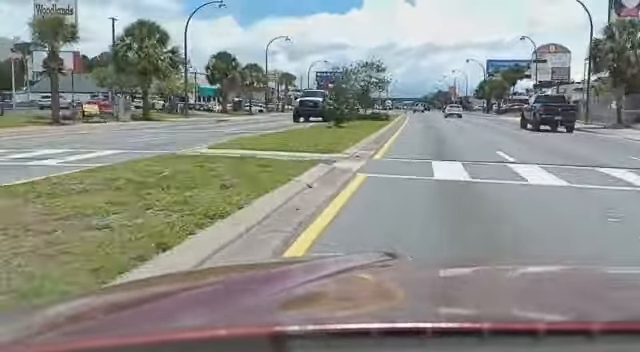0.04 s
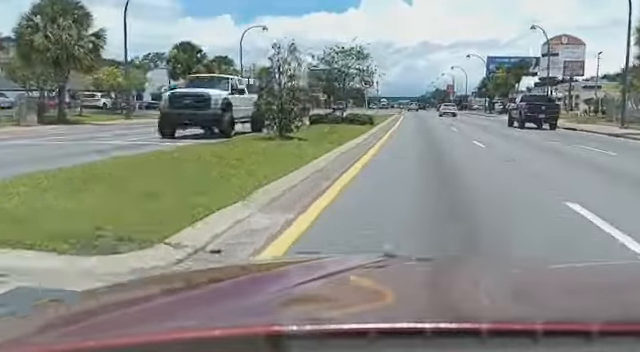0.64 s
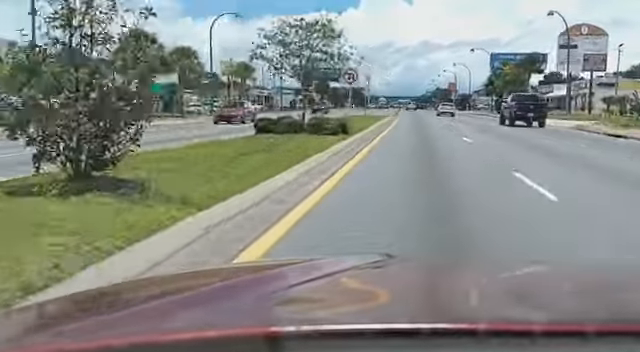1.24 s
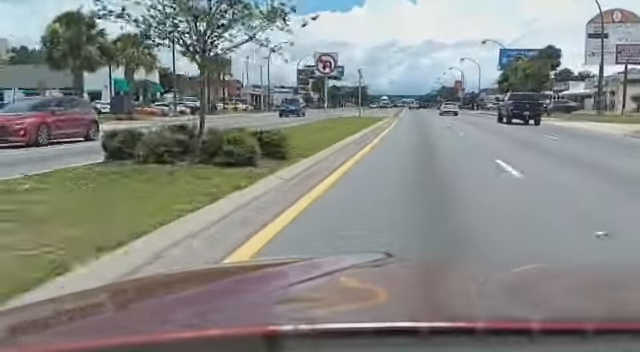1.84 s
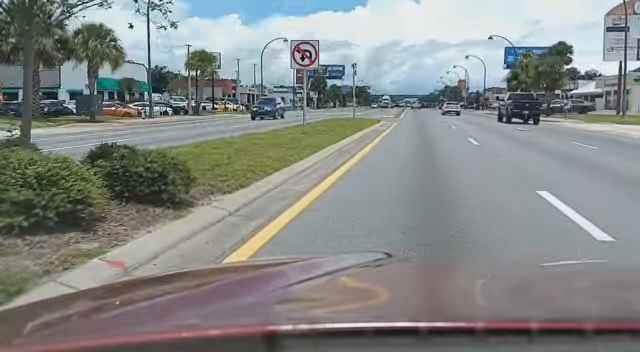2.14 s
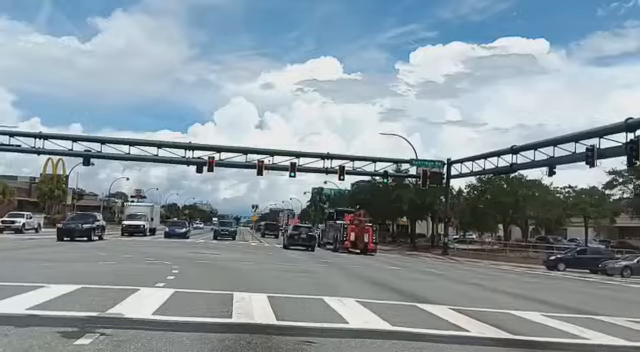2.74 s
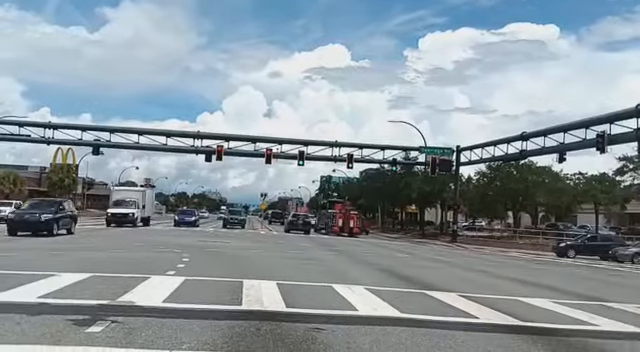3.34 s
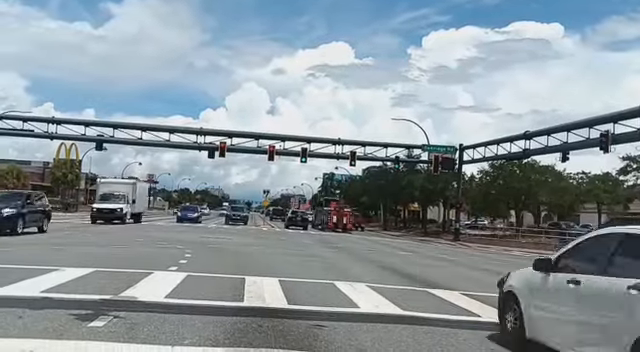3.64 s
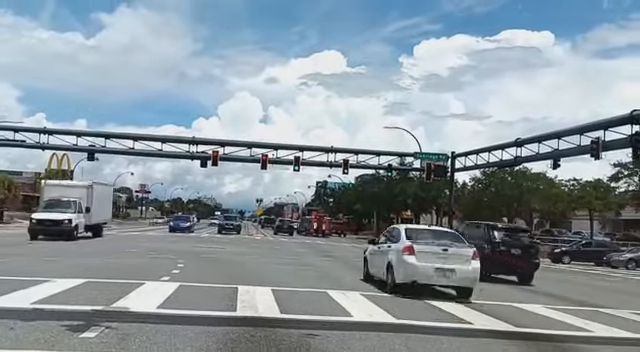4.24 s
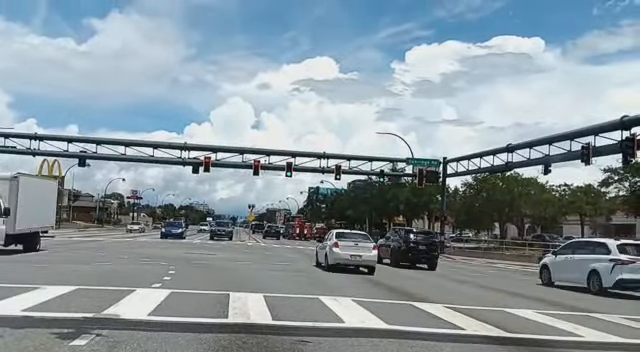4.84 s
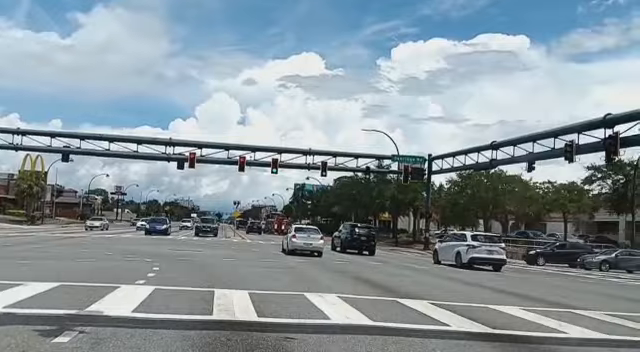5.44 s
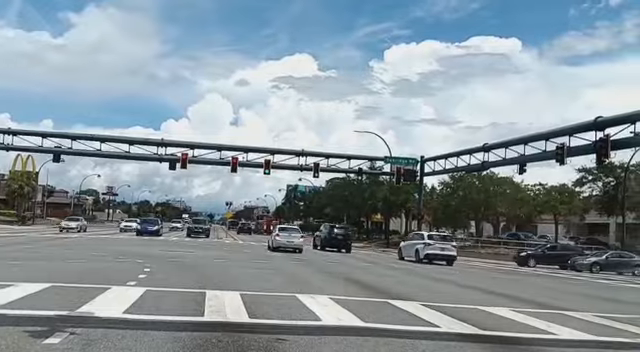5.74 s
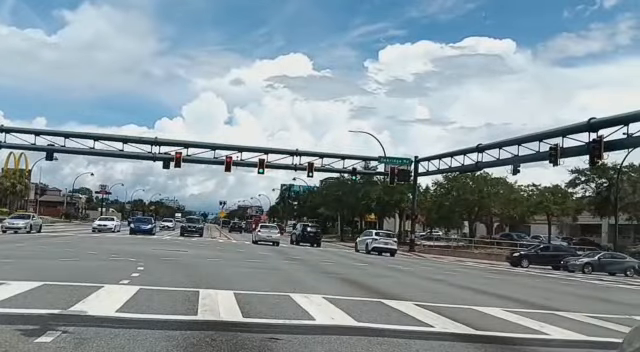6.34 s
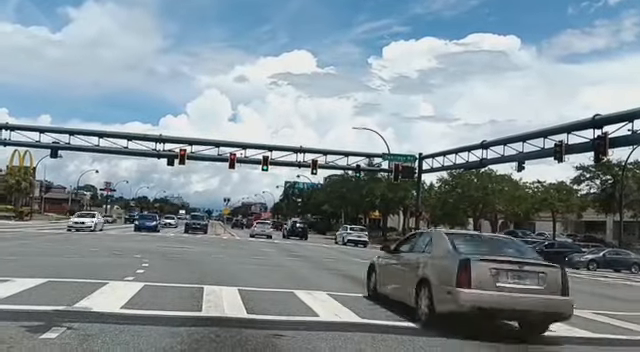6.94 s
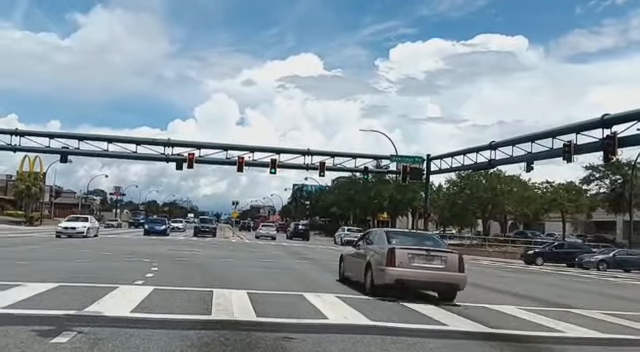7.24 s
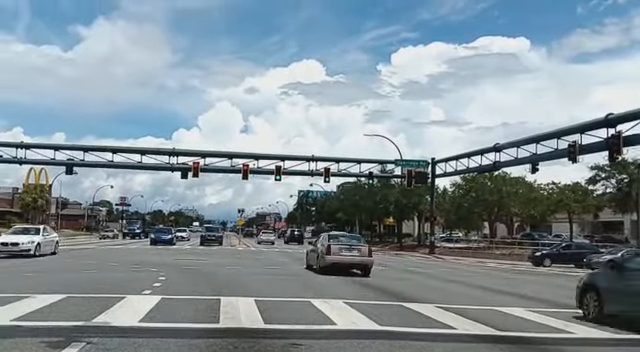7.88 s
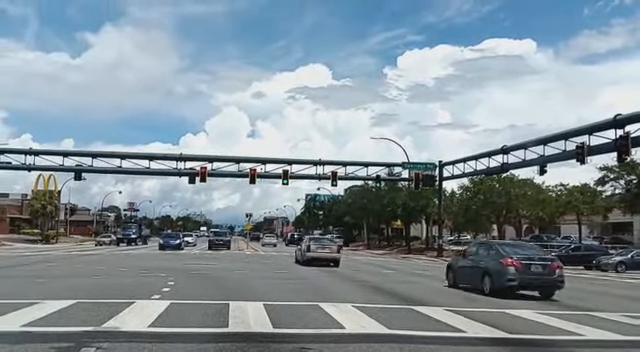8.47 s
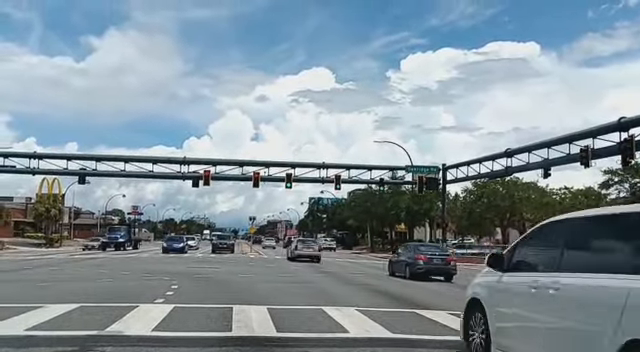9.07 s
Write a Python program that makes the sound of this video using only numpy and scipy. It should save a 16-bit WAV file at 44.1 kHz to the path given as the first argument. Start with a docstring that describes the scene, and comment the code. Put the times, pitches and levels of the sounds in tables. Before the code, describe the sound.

The sound is heard from inside a car with the windows closed. From the start it cruises along a town road, with a steady deep tyre rumble, an engine hum and very faint ticks and twitters of shaken trim. At about 0.8 seconds the wheels thump over a seam in the asphalt. At 2.4 seconds the drive cuts off into half a second of silence.

Around 2.9 seconds a quieter, lower idle fades in, with distant traffic behind it. The turn signal clicks evenly to the end, a bright tick alternating with a duller tock, nearly three clicks a second. A low exhaust drone swells near 3.2 seconds, and muffled cars pull past softly at about 3 to 4, 5.5 to 7 and 8.5 seconds. A faint, high, rapid chirping from a rotating part runs under both parts, growing slightly around 4 seconds. It ends at about 9 seconds.

```python
"""Tyres and engine rumble inside a car cruising along a town road. The wheels thump over a seam in
the asphalt, and the road shakes trim and panels. After a short silence the car stands idling at a
crossing: the turn-signal relay snaps and rings its housing, and other cars pull past beyond the
closed windows. A rotating part rubs and chirps faintly, both on the move and at idle."""
import sys
import numpy as np
from scipy import signal
from scipy.fft import rfft, irfft, next_fast_len
from scipy.io import wavfile
from scipy.ndimage import uniform_filter1d

SR = 44100
rng = np.random.default_rng(int(sys.argv[2]) if len(sys.argv) > 2 else 0)


def int16_out(signal):
    """Quantize to a 16-bit WAV file."""
    q = np.round(np.clip(np.atleast_2d(signal).T, -1, 1) * 32767)
    wavfile.write(sys.argv[1], SR, q.astype(np.int16))


N = 401751
TIME = np.arange(N) / SR
PAN = np.array([[.5], [-.5]])   # shares a left-minus-right dB value between the channels

# Modes of the relay and its housing. Each row: pitch in Hz, width in Hz, relative level in dB when
# pulling in, relative level in dB when dropping out.
RELAY_MODES = [(1540, 130, -12, -3), (2216, 120, -12.5, -11.5), (2760, 163, 1, -8), (2994, 98, -13, -5.5),
               (4090, 250, -10, -15), (4573, 270, -1, 1.5), (4810, 210, -11.5, -12), (5380, 150, -31, -12),
               (5730, 220, -12, -18), (6014, 260, 1, -7.5), (6370, 310, -2.5, -8), (7950, 140, -7, -2),
               (8620, 260, -19, -10), (8940, 430, 7.5, -5.5), (9380, 270, 4.5, -2.5),
               (10090, 230, -9, -5.5), (10300, 220, 4.5, -29), (11050, 360, 1.5, -9),
               (12270, 610, -11, -19.5), (13100, 740, -19, -31), (15550, 350, -15, -29)]


def road_noise():
    """Asphalt drives body rumble and tyre roar; both lift on the rough patch around the seam."""
    # Road noise in the cabin. Each row: frequency in Hz, relative density in dB.
    spectrum = [(20, -10.5), (40, 2), (85, -2), (130, -9), (180, -8.5), (300, -13.5), (410, -15.5),
                (550, -21), (800, -34.5), (1400, -40), (1950, -53), (2700, -69.5), (4500, -72.5),
                (10000, -76.5), (15000, -90)]
    # Cabin and tyre resonances. Each row: centre in Hz, width in Hz, lift in dB.
    modes = [(176, 18, 5.5), (235, 16, 2.5), (301, 17, 2.5), (470, 16, 2.5), (545, 16, 5), (1820, 200, 4)]
    rumble, roar = cabin_noise(spectrum, modes, splits_hz=[230], ripple_db=1.5)
    rough_patch = swell(0.8, 0.35)
    rumble_db = -17.5 + 2.0 * rough_patch
    roar_db = -22.5 + 1.2 * rough_patch + 0.67 * drift(19)
    return from_db(rumble_db) * rumble + from_db(roar_db) * murmur(roar, depth_db=1.5, rate=9)


def engine(firings_per_s, orders, rough, wander):
    """Orders of the firing rate; uneven combustion shakes their strength and phase."""
    firing_phase = 2 * np.pi * np.cumsum(firings_per_s) / SR
    out = np.zeros(N)
    for order, db in orders:
        phase = order * firing_phase + rng.uniform(0, 2 * np.pi) + wander * drift(1.7)
        out += np.sqrt(2) * from_db(db) * (1 + rough * drift(3.2)) * np.sin(phase)
    return out


def cruising_engine():
    """The engine hums under light load at a nearly even speed."""
    # Engine speed. Each row: time in seconds, firings per second.
    speed = [(0, 39.4), (.8, 37), (1.6, 39.0), (2.4, 38.1)]
    # Engine tones. Each row: multiple of the firing rate, rms level in dB.
    orders = [(1, -32.5), (2, -27.5), (3, -33.5), (4, -27), (6, -37.5)]
    return engine(np.interp(TIME, *np.transpose(speed)), orders, rough=0.43, wander=0.94)


def idling_engine():
    """A slow throb whose speed hunts a little around its mean."""
    # Idle tones. Each row: multiple of the firing rate, relative level in dB.
    orders = [(1, -7.5), (2, 0), (3, -19), (4, -16.5), (4.5, -20), (5, -10.5), (6, -17.5), (7, -18),
              (8, -17.5), (9, -32.5)]
    firings_per_s = 23.0 + 0.1297 * drift(1.51)
    return from_db(-26) * engine(firings_per_s, orders, rough=0.18, wander=0.25)


def seam_thumps(body_hz=45, decay_s=0.021):
    """Each wheel's blow sets the body booming for a cycle or two."""
    # Wheels hitting the seam. Each row: start in seconds, level in dB.
    blows = [(0.809, -2), (0.859, -1), (0.883, -9)]
    out, t = np.zeros(N), np.arange(SR // 4) / SR
    for start_s, db in blows:
        add(out, start_s, from_db(db) * np.sin(2 * np.pi * body_hz * t) * np.exp(-t / decay_s))
    return out


def relay(times, mode_db, level_db, rise_s, hold_s, t60, variation, ringing):
    """The armature's snap rings the housing; cabin reflections smear every tick much alike."""
    # Where the relay is heard. Each row: frequency in Hz, left minus right in dB.
    balance = [(1500, -1), (6000, -1), (8500, 10), (9300, -5), (10200, -11), (15000, -10)]
    t = np.arange(SR // 10) / SR
    smear = from_db(-60 * np.maximum(t - hold_s, 0) / t60) * (1 - np.exp(-(t / rise_s) ** 3))
    # the direct snap comes first, stronger on the nearer, right side
    smear = smear * (1 + np.array([[0.4], [1.6]]) * np.exp(-(t / 0.007) ** 2))
    paths = rng.standard_normal((2, len(t))) + variation * rng.standard_normal((len(times), 2, len(t)))
    clicks = 0
    for (hz, width, *_), db in zip(RELAY_MODES, mode_db):
        ring = resonate(resonate(paths * smear, hz, width * 1.36), hz, width * 2.4)
        ring += ringing * resonate(ring, hz, width / 4)   # a narrow, longer-lived core
        ring /= np.sqrt(np.mean(ring ** 2, axis=(0, 2), keepdims=True))
        clicks += from_db(db + at_hz(balance, hz) * PAN) * np.sqrt(width) * ring
    out = np.zeros((2, N))
    for time_s, click in zip(times, rms_one(clicks)):
        add(out, time_s - .003, from_db(level_db) * click)
    return out


def turn_signal(first_s=2.6621, blink_s=0.75339, closed_s=0.363):
    """The relay pulls in with a bright tick once a blink and drops out with a duller tock."""
    _, _, pull_db, drop_db = np.transpose(RELAY_MODES)
    pulls = np.arange(first_s, N / SR - closed_s, blink_s)
    ticks = relay(pulls, pull_db, level_db=-44,
                  rise_s=0.0017, hold_s=0.0088, t60=0.056, variation=0.5, ringing=0.87)
    tocks = relay(pulls + closed_s, drop_db, level_db=-51,
                  rise_s=0.0026, hold_s=0.0069, t60=0.068, variation=0.66, ringing=0.86)
    return ticks + tocks


def rotor_chirp(turns_per_s, rub_s, sharpness, light_rub, whine, sizzle, overtone_db, scrape_db):
    """A rotating part sings near 7 kHz; it rubs twice a turn, once firmly and once lightly."""
    angle = 2 * np.pi * turns_per_s * (TIME - rub_s) + .25 * drift(4)
    firm = np.exp(sharpness * (np.cos(angle) - 1)) * from_db(1.3 * drift(10))
    light = np.exp(2 * sharpness * (-np.cos(angle) - 1))
    squeal = tone(6964 + 35 * drift(90)) * (1 + 0.45 * drift(90))
    friction = rng.standard_normal((2, N))

    def band(hz, width):
        return rms_one(focus(friction, hz, width))

    overtones = (sizzle + firm) * (band(7700, 350) + 0.78 * band(7220, 250))
    overtones += 0.92 * firm * band(6350, 300)
    scrape = (sizzle + firm) * (band(10600, 1600) + 0.56 * band(2650, 250) + 0.56 * band(3700, 900))
    rub = from_db(overtone_db) * overtones + from_db(scrape_db) * scrape
    return squeal * (whine + 0.54 * firm + light_rub * light) + rub


def trim_ticks():
    """Tiny bright ticks of plastic shaken by the road, each with a short ring."""
    # Loose trim ticking. Each row: start in seconds, relative level in dB.
    ticks = [(.094, -43), (.154, -65.5), (0.293, -26), (.328, -45), (.349, -44)]
    out, t = np.zeros((2, N)), np.arange(SR // 20) / SR
    decay = np.exp(-t / .0018) + .15 * np.exp(-t / .009)
    for start_s, db in ticks:
        add(out, start_s, from_db(db) * rng.standard_normal((2, len(t))) * decay)
    bright = signal.sosfilt(signal.butter(3, [9700, 13000], "band", fs=SR, output="sos"), out + 1e-18)
    return bright + 1.5 * resonate(bright, hz=10850, width=80)


def trim_squeak(start_s=8.585, length_s=0.065, hz=10202):
    """A short, slightly rising squeak of trim on the right."""
    out, progress = np.zeros((2, N)), np.linspace(0, 1, round(length_s * SR))
    squeak = tone(hz + 250 * (progress - .5) + 80 * drift(200)[:len(progress)])
    add(out, start_s, from_db([[-66], [-56]]) * np.sin(np.pi * progress) ** 2 * squeak)
    return out


def panel_twitter(fitful_db=8.5):
    """Panels sing in random fits as the road shakes them."""
    # Panel resonances. Each row: pitch in Hz, width in Hz, rms level in dB.
    panels = [(2305, 55, -70), (2720, 60, -76), (3180, 47, -81), (4400, 200, -80.5)]
    out = 0
    for hz, width, db in panels:
        song = focus(rng.standard_normal((2, N)), hz, width)
        fits = from_db(fitful_db * np.tanh(drift(4.2)))
        out += from_db(db) * rms_one(song * fits)
    return out


def passing_cars(engine_noise, far_engines_db=-46):
    """Each car's engine and tyre hum swell out of the distant engines as it draws alongside."""
    # Cars pulling past. Each row: closest moment in seconds, spread in seconds, engine level in dB,
    # tyre level in dB.
    passes = [(3.27, 0.15, -46.5, -58.5), (3.7, 0.17, -52, -63), (5.6, 0.13, -45.5, -65.5),
              (6.25, 0.21, -45, -62.5), (7.0, 0.16, -49, -64.5), (8.42, 0.09, -56, -60),
              (8.75, 0.18, -46.5, -57.5)]
    hum = focus(rng.standard_normal((2, N)), hz=760, width=520)
    engine_gain = sum(from_db(db) * swell(at, spread) for at, spread, db, _ in passes)
    tyre_gain = sum(from_db(db) * swell(at, spread) for at, spread, _, db in passes)
    engines = np.hypot(from_db(far_engines_db), engine_gain) * engine_noise
    return engines + tyre_gain * murmur(hum, depth_db=5.5, rate=4.4)


def exhaust_drone(hz=57, level_db=-26):
    """The first car pulls away on a low, wavering exhaust note that beats against the idle."""
    return np.sqrt(2) * from_db(level_db) * swell(3.22, 0.26) * tone(hz + 1.26 * drift(2.7))


def traffic():
    """Far rumble, cabin boom, tyres and hiss through closed windows, with nearer cars on top."""
    # Noise in the standing car. Each row: frequency in Hz, relative density in dB.
    spectrum = [(20, -15.5), (58, 3), (80, -9.5), (170, -16.5), (240, -29.5), (350, -32), (520, -44),
                (700, -50.5), (1400, -61.5), (2000, -64.5), (4000, -74.5), (9000, -73.5), (15000, -87)]
    # Cabin resonances. Each row: centre in Hz, width in Hz, lift in dB.
    modes = [(177, 22, 1.5), (344, 56, 3.5), (526, 69, 3.5), (1450, 300, 10.5), (2610, 190, 2)]
    rumble, boom, engines, tyres, hiss = cabin_noise(
        spectrum, modes, splits_hz=[100, 215, 650, 2200], ripple_db=1.46)
    far = from_db(-35.5) * rumble + from_db(-36 + 2.1 * drift(3.3)) * boom
    far += from_db(-64) * murmur(tyres, depth_db=4, rate=5.4) + from_db(-73.5) * hiss
    return far + passing_cars(murmur(engines, depth_db=3, rate=3.4)) + exhaust_drone()


def cabin_noise(spectrum, modes, splits_hz, ripple_db):
    """Stereo noise coloured by the cabin, split into bands of unit rms."""
    # Stereo width in the cabin. Each row: frequency in Hz, left-right likeness from 0 to 1.
    likeness = [(40, 1), (170, 0.99), (390, 0.62), (600, 0.21), (1300, .4), (3000, 0.087), (15000, .05)]
    # Stereo lean in the cabin. Each row: frequency in Hz, left minus right in dB.
    balance = [(40, -0.5), (120, 0.4), (260, -3.2), (480, 1), (1000, -0.2), (2000, -1.5), (8000, 3),
               (14000, -4)]
    size = next_fast_len(N)
    hz = np.arange(size // 2 + 1) * SR / size
    mid, side = rfft(rng.standard_normal((2, size)))
    alike = at_hz(likeness, hz)
    noise = np.sqrt(1 + alike) * mid + np.sqrt(1 - alike) * side * [[1], [-1]]
    db = at_hz(spectrum, hz)
    db += sum(lift / (1 + (2 * (hz - centre) / width) ** 2) for centre, width, lift in modes)
    # countless small cabin modes ripple the response above the bass
    knots = np.geomspace(400, SR / 2, 150)
    db += ripple_db * np.interp(hz, knots, rng.standard_normal(len(knots)), left=0)
    noise *= from_db(db + at_hz(balance, hz) * PAN) * (hz > 19)
    band = np.searchsorted(splits_hz, hz)
    return [rms_one(irfft(noise * (band == k), size)[:, :N]) for k in range(len(splits_hz) + 1)]


def murmur(x, depth_db, rate):
    """Each narrow band swells and sinks on its own, like many distant vehicles; unit rms."""
    spectra = signal.stft(x, nperseg=1024)[2]
    pole = np.exp(-2 * np.pi * rate * 512 / SR)
    jitter = uniform_filter1d(rng.standard_normal(spectra.shape[1:]), size=3, axis=0)
    sway = rms_one(signal.lfilter([1], [1, -pole], jitter))
    return rms_one(signal.istft(spectra * from_db(depth_db * sway))[1][:, :N])


def drift(rate):
    """A smooth random wander of about unit rms, rolling off above rate in Hz."""
    hop, settle = 40, 2000
    pole = np.exp(-2 * np.pi * rate * hop / SR)
    white = rng.standard_normal(N // hop + settle + 2)
    slow = signal.lfilter([1], [1, -2 * pole, pole * pole], white)[settle:]
    return np.interp(np.arange(N) / hop, np.arange(len(slow)), rms_one(slow))


def swell(peak_s, spread_s):
    """A bell-shaped rise and fall."""
    return np.exp(-.5 * ((TIME - peak_s) / spread_s) ** 2)


def tone(hz):
    """A sine that follows a pitch curve."""
    return np.sin(2 * np.pi * np.cumsum(hz) / SR)


def resonate(x, hz, width):
    """A resonance with unit gain at its peak; width in Hz."""
    r = np.exp(-np.pi * width / SR)
    feedback = [1, -2 * r * np.cos(2 * np.pi * hz / SR), r * r]
    return signal.lfilter(np.array([1, 0, -1]) * (1 - r * r) / 2, feedback, x + 1e-18)


def focus(x, hz, width):
    """Two resonances in series give a band with steeper skirts."""
    return resonate(resonate(x, hz, width), hz, 2 * width)


def at_hz(points, hz):
    """Read a table on a log-frequency axis."""
    knots_hz, values = np.transpose(points)
    return np.interp(np.log(hz + 1e-9), np.log(knots_hz), values)


def from_db(db):
    """Decibels to gain."""
    return 10 ** (np.asarray(db) / 20)


def rms_one(x):
    """Scale to unit rms."""
    return x / np.sqrt(np.mean(x ** 2) + 1e-20)


def add(out, start_s, sound):
    """Mix a short sound in."""
    at = round(start_s * SR)
    out[..., at:at + sound.shape[-1]] += sound[..., :N - at]


def scene():
    """The drive cuts off; after a short silence the crossing fades in."""
    cruise_end_s, idle_start_s, left_lag_s = 2.44, 2.912, 0.001052
    drive = road_noise() + cruising_engine() + seam_thumps() + trim_ticks() + panel_twitter()
    drive += from_db(-71.5) * rotor_chirp(
        turns_per_s=17.7, rub_s=2.068, sharpness=4.2, light_rub=0.8,
        whine=0.16, sizzle=0.2, overtone_db=-3, scrape_db=-7.5)
    crossing = traffic() + idling_engine() + trim_squeak()
    chirp_db = np.interp(TIME, [3.85, 4.25], [-70.5, -64])   # starts soft, then swells
    crossing += from_db(chirp_db) * rotor_chirp(
        turns_per_s=18.46, rub_s=5.893, sharpness=4.6, light_rub=0.59,
        whine=0.22, sizzle=0.36, overtone_db=-5.5, scrape_db=-9.5)
    for cabin in drive, crossing:   # cabin sound reaches the left side late
        cabin[0] = np.roll(cabin[0], round(left_lag_s * SR))
    drive_on = np.clip(TIME / .002, 0, 1) * (TIME < cruise_end_s)
    fade_in = np.clip((TIME - idle_start_s) / 0.2, 0, 1)
    return drive_on * drive + fade_in * (crossing + turn_signal())


def record(dry):
    """The heaviest thumps are rounded, and the top is cut steeply at 16 kHz."""
    rounded = dry / (1 + dry ** 8) ** (1 / 8)
    return signal.sosfilt(signal.ellip(10, .1, 90, 16000, fs=SR, output="sos"), rounded)


dry = scene()
out = record(dry)
int16_out(out)
```